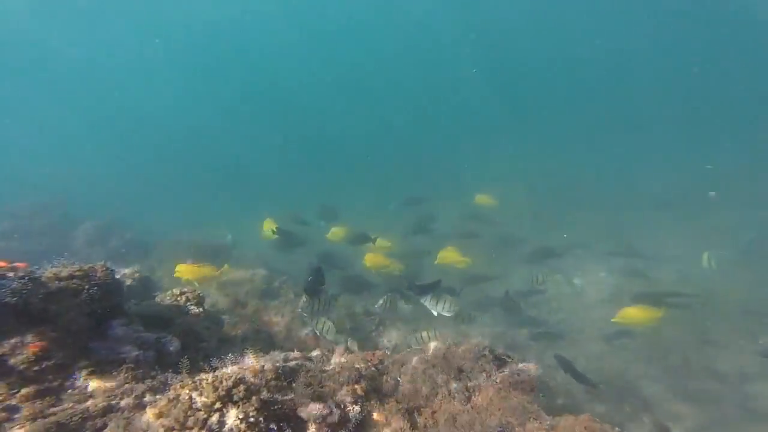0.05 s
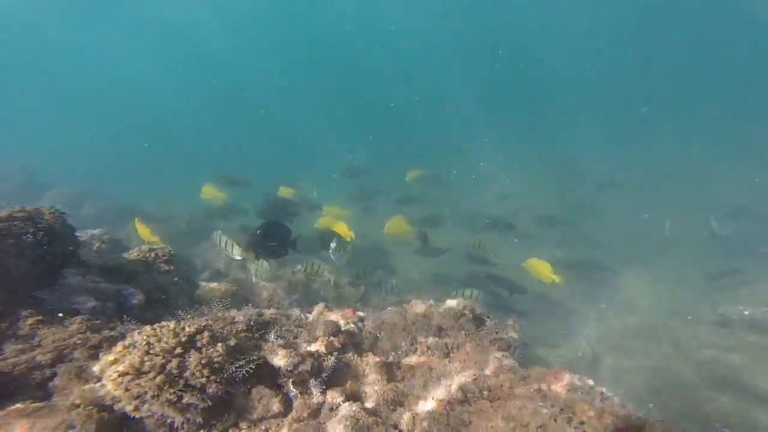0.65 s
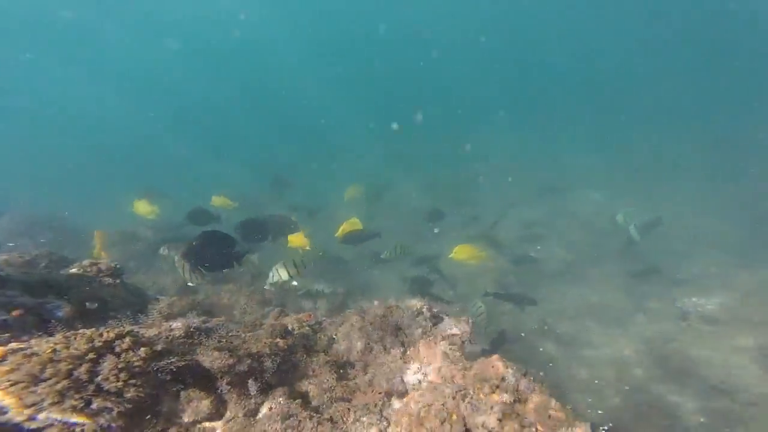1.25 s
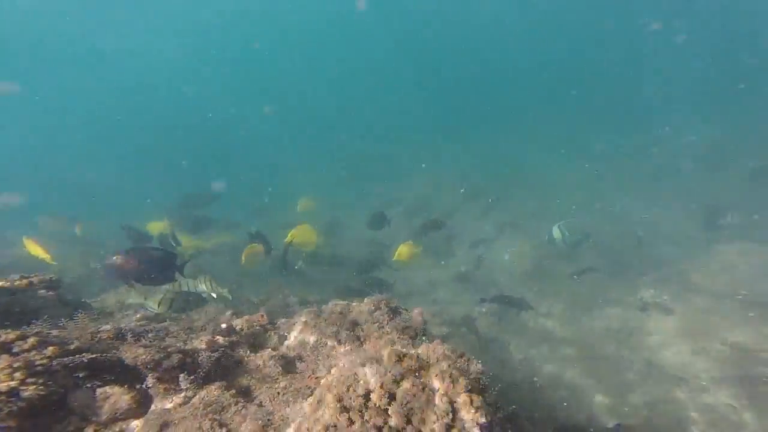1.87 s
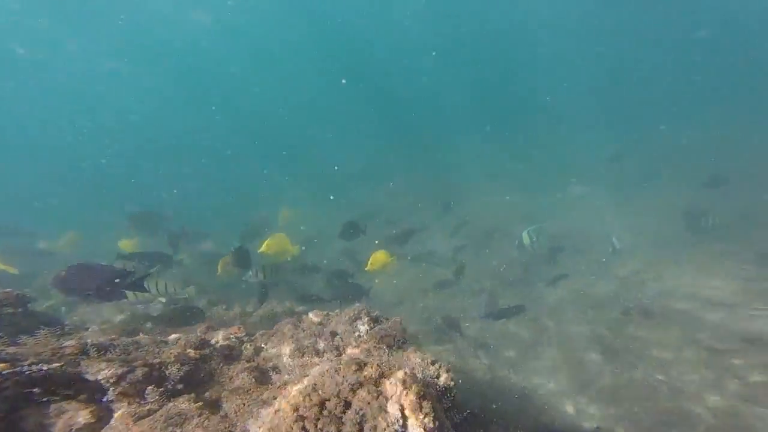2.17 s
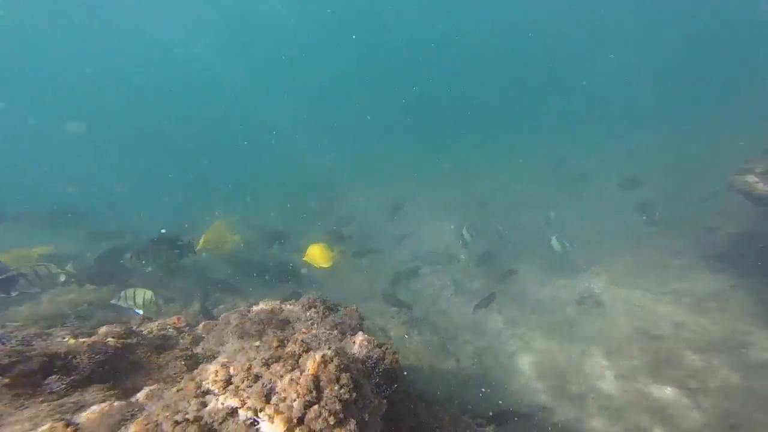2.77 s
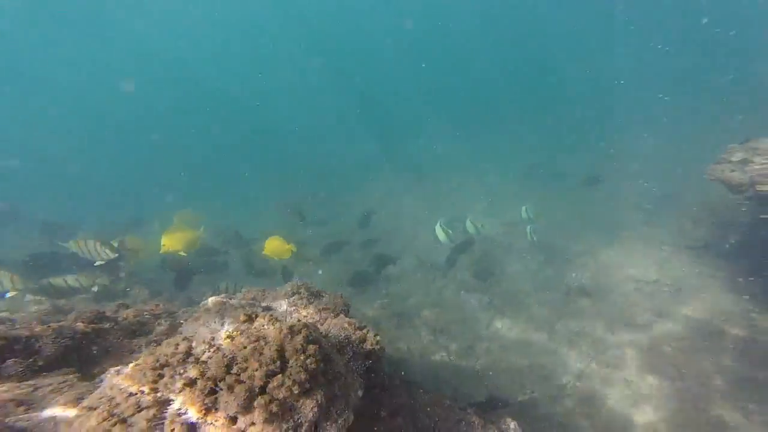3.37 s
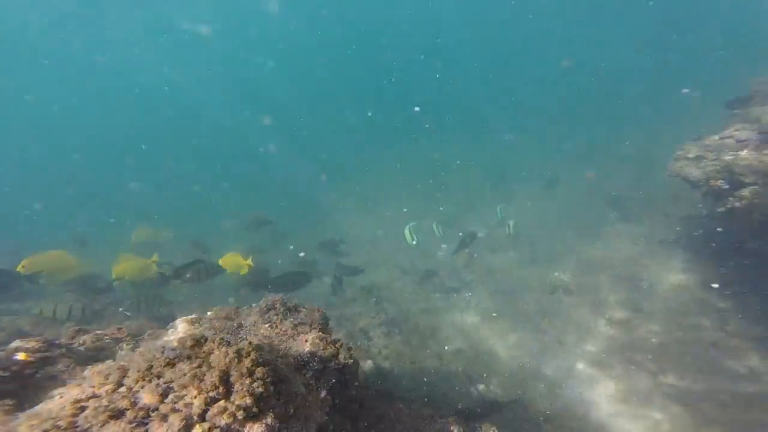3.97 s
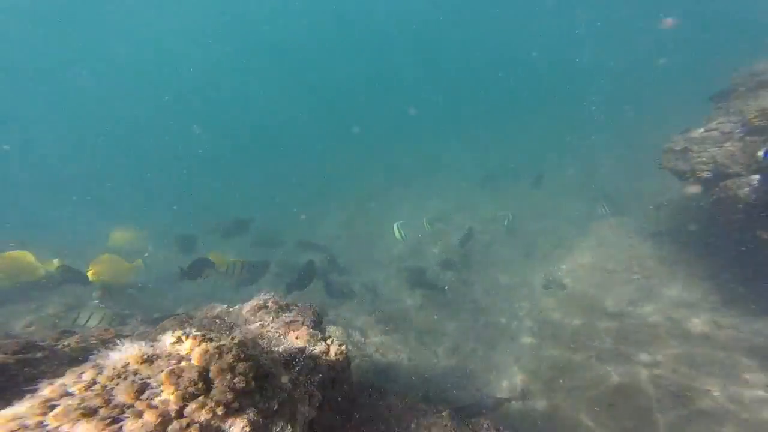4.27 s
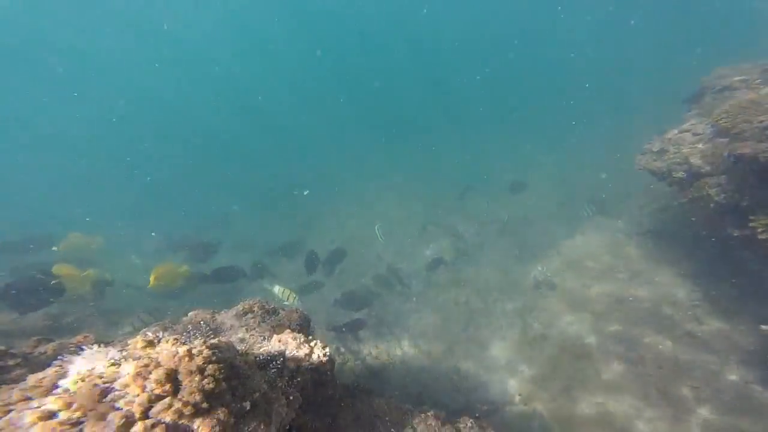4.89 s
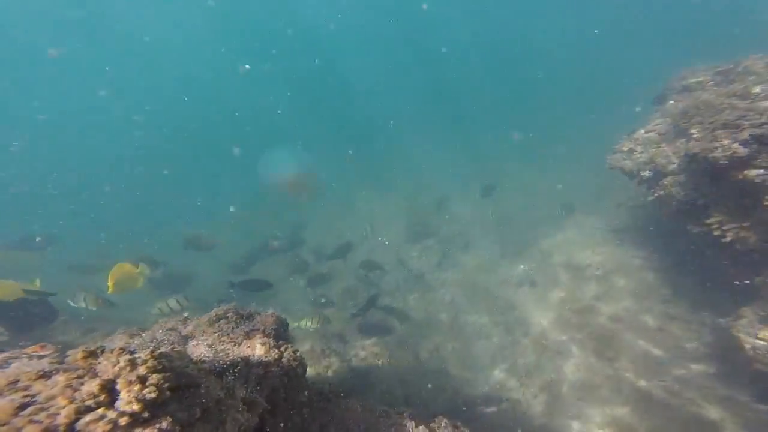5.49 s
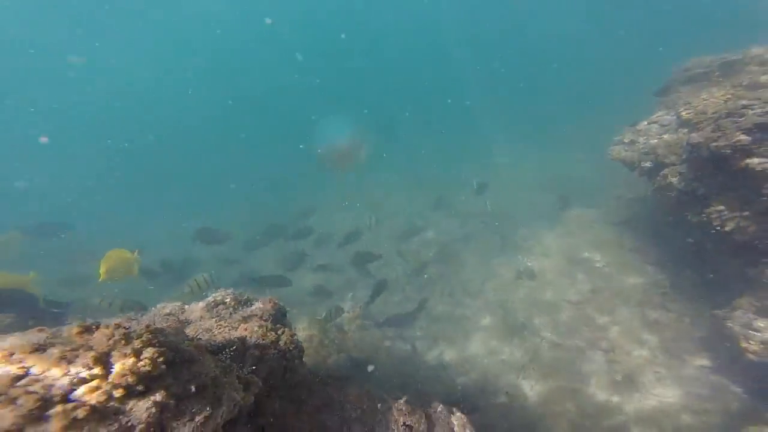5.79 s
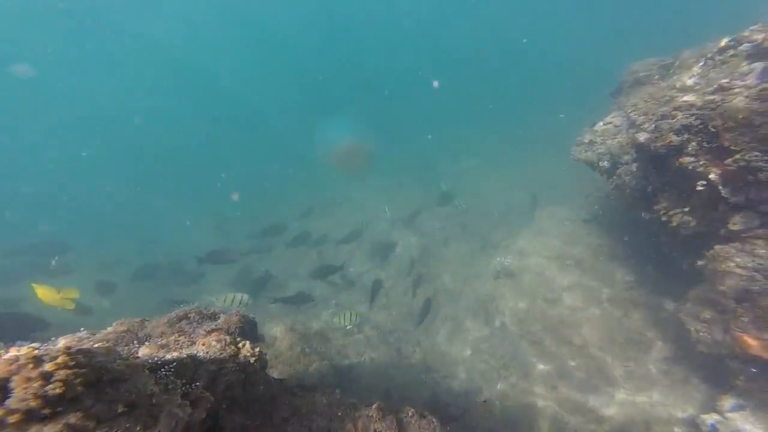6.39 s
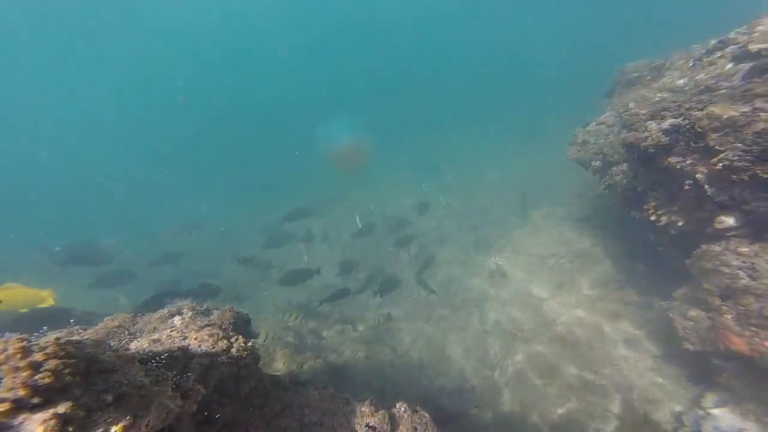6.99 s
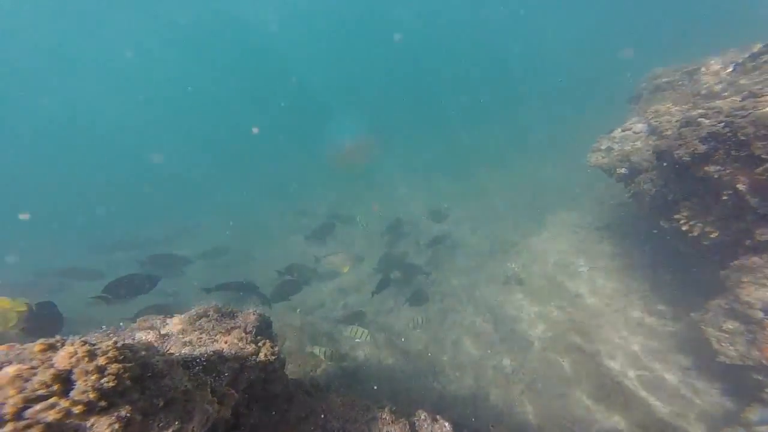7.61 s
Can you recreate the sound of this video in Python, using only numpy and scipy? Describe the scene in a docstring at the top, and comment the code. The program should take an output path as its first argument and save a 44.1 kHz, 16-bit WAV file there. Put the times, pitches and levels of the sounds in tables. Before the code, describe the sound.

Underwater on a shallow reef, snapping shrimp and grazing fish make a dense, uneven crackle, with sharper close clicks and small hollow pops standing out. Beneath it, surging water rumbles against the microphone's waterproof case, with occasional soft gulps and very faint bubbling. Around five seconds the closest snaps briefly pause, then return as the rumble slowly eases.

```python
"""A camera in a waterproof case drifts over a shallow reef near a rocky shore.
From the start, surging water rumbles along the case, tiny bubbles ring faintly, and snapping shrimp
and grazing fish crackle all around. Each snap rings the case for a few milliseconds.
From half a second on, the water gulps softly now and then. Around five seconds the closest snaps
pause, then return while the rumble slowly eases."""
import sys
import numpy as np
from scipy import signal
from scipy.fft import rfft, irfft
from scipy.io import wavfile

SR = 44100
rng = np.random.default_rng(int(sys.argv[2]) if len(sys.argv) > 2 else 0)


def wav_record(signal):
    """Record a signal, one row per channel, as 16-bit PCM in the file named by sys.argv[1]."""
    frames = np.transpose(np.atleast_2d(signal))
    bounded = np.clip(frames, -1, 1)
    # unit amplitude maps onto the largest positive 16-bit level
    quanta = np.round(bounded * 32767).astype(np.int16)
    wavfile.write(sys.argv[1], SR, quanta)


N = 337365
TIME = np.arange(N) / SR

# how hard the water pushes on the case and swirls around it: time_s, push_db, churn_db
SURGE_LEVELS = [(0, -37, -50), (0.25, -36, -54), (0.55, -39, -43), (0.9, -38.5, -47.5), (1.4, -37, -53.0),
                (1.7, -37.5, -48), (2.65, -36, -49), (3.25, -36.5, -49.0), (3.9, -43, -51),
                (4.1, -36.5, -49), (4.45, -38.5, -52.5), (4.8, -44.5, -55), (5.55, -39, -51.5),
                (5.85, -45, -55.5), (6.2, -40.5, -53), (6.65, -41.5, -56.0), (7.25, -40, -57),
                (7.65, -48, -55.5)]
# the tone of the push, the swirls and the wash from the shore: frequency_hz, relative_db
PUSH_SPECTRUM = [(8, -3), (18, 2), (27, -0.5), (42, -6.5), (60, -10), (90, -18.5), (150, -46), (400, -101)]
CHURN_SPECTRUM = [(30, -3.5), (70, -8), (125, -1), (190, -8.5), (240, -16.5), (330, -20), (600, -26),
                  (1500, -48)]
WASH_SPECTRUM = [(100, -0.5), (250, 5.5), (450, 2.5), (700, 0.5), (1100, -2), (1600, -2.5), (4000, -29),
                 (9000, -15.5), (15000, -44)]
# how quickly the surge wobbles and the flurries of snaps come and go: frequency_hz, relative_db
WOBBLE_SPECTRUM = [(2, -6), (8, 0), (16, 0), (40, -30), (200, -100)]
FLURRY_SPECTRUM = [(1, -6), (4, 0), (15, 0), (40, -30), (200, -100)]
# how busy the reef sounds: time_s, relative_db
REEF_ACTIVITY = [(0.0, -50), (1.49, -51.5), (1.89, -48), (2.66, -50), (3.56, -51.5), (5.62, -53.5),
                 (6.44, -54), (7.65, -53)]
# the notes the case rings at: pitch_hz, relative_db, swell_s
CASE_NOTES = [(702, -16, 0.00063), (985, -15.5, 0.0021), (1661, -2, 0.0013), (2226, 0.5, 0.00066),
              (2630, -5, 0.00096), (2926, -8, 0.0018), (3486, -0.5, 0.0007), (4014, -2, 0.0007),
              (4780, -8, 0.00027), (5945, -4, 0.00032), (8065, 1.5, 0.00015), (10600, -8, 0.00015),
              (12800, -8, 0.0002)]
# spells of faint bubbling: start_s, end_s, middle_pitch_hz, loudest_db
BUBBLE_SPELLS = [(.35, .85, 1400, -46), (5.3, 5.7, 680, -49), (0, 8.7, 650, -60)]
# round pops and thin ticks a little way off (a higher ring_q rings longer):
# snaps_per_s, level_db, pitch_hz, spread_octaves, ring_q, crack_above_pop_db
CHATTER_VOICES = [(9, -15, 3140, 0.57, 3.9, -5), (4.7, -14, 8300, 0.19, 2.1, -6)]
# close snaps and dull knocks: start_s, level_db, pitch_hz, ring_q, crack_above_pop_db
CLOSE_SNAPS = [(0.0831, -12, 6200, 12, 1), (0.15, -7, 2100, 4.6, -14), (0.1854, 7.5, 2620, 6.2, -15.5),
               (0.2131, -6.5, 2520, 11.0, -7), (0.3266, -17.5, 4400, 0.69, -10),
               (0.459, -8.5, 4140, 9.2, -5), (0.5648, -3.5, 3950, 0.84, -6.5),
               (0.5834, -7.5, 2130, 1.9, -20), (0.633, 8.5, 2610, 5.8, -27.5), (0.677, -6, 3000, 5.6, -26),
               (0.7533, -9.5, 4290, 1.6, -22), (0.788, -6, 4560, 3.6, -22), (0.8225, 8.0, 2300, 4.4, -38),
               (0.8493, -6.5, 7950, 13, -1.5), (1.1102, -4.5, 5900, 1.15, -14),
               (1.1255, 5.5, 2700, 5.1, -32), (1.274, 3.5, 8000, 7, -17), (1.2959, 1.5, 2250, 5.9, -23),
               (1.4492, -1.5, 4880, 0.84, -5), (1.4633, -4.0, 3300, 3.1, -12),
               (1.5865, -5.5, 5560, 3, -8.5), (1.628, -2, 1880, 9, -11), (1.7329, -2, 7840, 2.9, -14),
               (1.7836, 0, 1890, 0.41, -14.5), (1.8377, -1.5, 2500, 0.85, -5), (2.017, 1, 2810, 6.2, -18),
               (2.0422, -7.0, 3060, 11.0, -6.5), (2.077, -11, 7140, 0.9, -14),
               (2.099, -7.5, 3440, 11.0, -9), (2.2225, -9, 7160, 0.86, -8), (2.34, -10, 6460, 1.9, -36),
               (2.3534, 1, 4600, 3.7, -14.5), (2.558, 5.5, 2290, 0.62, -16.5),
               (2.8446, -3.5, 4270, 6.4, -18), (2.9798, 0, 3350, 6.8, -17), (3.0522, -7.5, 2620, 6, -10),
               (3.1501, 0.5, 3100, 9.4, -14.5), (3.2529, -10, 7370, 1.4, -36),
               (3.3002, -4, 9050, 3.7, -13.5), (3.3662, -10.5, 6640, 1.16, -14),
               (3.4262, -4.0, 2120, 2.9, -17), (3.5287, 5, 3270, 7.2, -24), (3.5437, -3.5, 2540, 6.2, -19),
               (3.6086, -5.5, 4890, 0.8, -12), (3.9275, -0.5, 1630, 0.9, -12),
               (3.962, -9.5, 3300, 0.84, -12), (4.042, -13.5, 5310, 0.37, -19),
               (4.077, -5.5, 7080, 0.8, -12), (4.0836, -1.5, 2800, 3.3, -6), (4.1328, -6.5, 9060, 1.6, -34),
               (4.2181, 4.5, 3700, 0.77, -8), (4.2841, -11, 13360, 0.56, -10),
               (4.4417, -13, 7330, 0.75, -3), (4.6292, -13, 3020, 0.55, -9), (5.3228, -12.0, 3050, 1, -7.5),
               (5.5375, 8.0, 6160, 1.8, -7.5), (5.753, 1.5, 5330, 0.67, -4.5), (5.8104, 5.5, 5860, 5.4, -9),
               (6.111, 0, 8000, 3, -13), (6.1495, 4.5, 2450, 5.6, -19), (6.1763, -2.5, 2970, 8.8, -8.5),
               (6.2824, -8.5, 13200, 0.5, -4), (6.3119, -3, 13360, 2.2, -15.5),
               (6.4106, -5.5, 4010, 12, -7.5), (6.4344, -7.5, 3600, 4.8, -17), (6.5889, -5, 2230, 4.8, -12),
               (6.641, -11.5, 1820, 5.8, -5.5), (6.774, -12, 13360, 0.95, -2.5),
               (6.878, -2.5, 2970, 9.3, -3.5), (6.9138, -11, 7450, 1.3, -13), (6.9272, -2, 2820, 4, -9.5),
               (7.0222, -8.5, 12000, 2, -13), (7.3907, -8.5, 13360, 0.95, -12),
               (7.484, -8, 10010, 4.6, -6.5), (7.6006, -5.5, 3000, 2.9, -7)]
# gulps of water: start_s, pitch_hz, peak_db, swell_s
WATER_GULPS = [(.476, 156, -39.5, 0.0052), (0.632, 189, -38.5, .01), (0.863, 130, -42.5, 0.025),
               (1.678, 132, -37.5, 0.0091), (2.68, 180, -42.5, 0.0096), (3.071, 138, -42, 0.0081),
               (3.21, 98, -35.5, 0.0081), (4.13, 115, -42, 0.0086), (4.487, 136, -40, 0.0067),
               (6.055, 130, -44, 0.007), (6.828, 109, -39, 0.006)]


def gain_of(db):
    """Turns decibels into a number to multiply a sound by."""
    return 10 ** (np.asarray(db) / 20)


def curve(rows, column):
    """One column of a table, joined by straight lines in time."""
    rows = np.asarray(rows)
    return np.interp(TIME, rows[:, 0], rows[:, column])


def add(mix, start_s, sound):
    """Mixes a sound in at its start time."""
    part = mix[max(round(start_s * SR), 0):][:len(sound)]
    part += sound[:len(part)]


def noise(spectrum):
    """Noise with the given tone and an average strength (rms) of 1."""
    hz, db = np.transpose(spectrum)
    shape_db = np.interp(np.log(np.fft.rfftfreq(N, 1 / SR) + 1), np.log(hz + 1), db)
    shaped = irfft(rfft(rng.standard_normal(N)) * gain_of(shape_db), N)
    return shaped / np.sqrt(np.mean(shaped ** 2) + 1e-20)


def swelling_tone(t, hz, swell_s):
    """A tone that grows for swell_s, then dies away."""
    return t / swell_s * np.exp(1 - t / swell_s) * np.sin(2 * np.pi * hz * t)


def surge(push_db=-0.4, churn_db=-2.0, wash_db=-60, lumps_db=3.0, sway_db=2.5):
    """Water pushes on the case and swirls off in uneven lumps; a soft wash comes from the shore."""
    push = noise(PUSH_SPECTRUM) * gain_of(curve(SURGE_LEVELS, column=1) + push_db)
    push *= gain_of(sway_db * noise(WOBBLE_SPECTRUM))
    churn = noise(CHURN_SPECTRUM) * gain_of(curve(SURGE_LEVELS, column=2) + churn_db)
    churn *= gain_of(lumps_db * noise(WOBBLE_SPECTRUM))
    return push + churn + noise(WASH_SPECTRUM) * gain_of(wash_db)


def snap(hz, q, crack_db, direct=0.063, tilt_db_per_octave=0.2, scatter_hz=4200, scatter_s=0.0018,
         thud_db=-5, thud_hz=850, roundness=0.22, size=512):
    """A ringing pop plus a sharp crack; rough rock scatters the treble into a brief burst."""
    f = abs(np.fft.fftfreq(size, 1 / SR))
    ratio = f / hz
    pop = np.sqrt(ratio) / ((q * (1 - ratio ** 2)) ** 2 + ratio ** 2) / (1 + (ratio / 1.35) ** 14)
    # swelling over a cycle or two makes the pop sound round
    pop /= 1 + (roundness * q * (ratio - 1 / (ratio + 1e-6))) ** 4
    crack = gain_of(crack_db + tilt_db_per_octave * np.log2(np.maximum(f, 2000) / 5000)) ** 2
    # low pops also shove the water: a thud under the ring
    thud = gain_of(thud_db) ** 2 / (1 + (f / thud_hz) ** 8) / (1 + (hz / 2850) ** 20)
    # turn this spectrum into a pulse that starts suddenly, then fades (minimum phase)
    log_gain = np.log(pop + thud + crack) / 2
    clean = np.fft.ifft(np.exp(np.conj(signal.hilbert(log_gain)))).real[:size // 2]
    burst = rng.standard_normal(size) * np.exp(-np.arange(size) / SR / scatter_s)
    paths = np.sqrt(1 - direct ** 2) * burst / np.linalg.norm(burst)
    paths[0] = direct  # the part that arrives straight
    # low sounds pass the rocks unbroken
    treble = 1 / np.sqrt(1 + (scatter_hz / (f + 1)) ** 6)
    scatter = np.sqrt(1 - treble ** 2) + treble * np.fft.fft(paths)
    return np.fft.ifft(np.fft.fft(clean, size) * scatter).real[:size * 3 // 4]


def far_snaps(nearest_db=-15, per_s=1300, reach=6, falloff=1.5, low_hz=2600, high_hz=15000,
              q=3.1, crack_db=-14, flurry_db=3.5, count=64):
    """Shrimp across the seabed snap in flurries: the farther, the more of them and the fainter."""
    chance, place, kind = rng.random((3, N))
    flurries = gain_of(flurry_db * noise(FLURRY_SPECTRUM))
    voices = [snap(hz, q * rng.uniform(0.6, 3.84), crack_db)
              for hz in np.geomspace(low_hz, high_hz, count)]
    out = np.zeros(N)
    for at in np.flatnonzero(chance < flurries * per_s / SR):
        distance = np.sqrt(1 + place[at] * reach ** 2)
        add(out, at / SR, voices[int(kind[at] * count)] / distance ** falloff)
    return gain_of(nearest_db) * out


def busy_gain(follow):
    """Louder when the reef is busy; follow sets how strongly."""
    busy_db = curve(REEF_ACTIVITY, column=1)
    return gain_of(follow * (busy_db - busy_db.mean()))


def far_reef(sizzle_db=-62):
    """The far crackle, over a sizzle of snaps too distant to tell apart."""
    sizzle = gain_of(sizzle_db) * rng.standard_normal(N)
    return (far_snaps() + sizzle) * busy_gain(follow=0.29)


def shallow_echoes(sound, echo_db=-22, fade_s=0.039, echoes_per_s=500, patches=5):
    """Snaps bounce off the surface and rocks; each patch of reef has its own echoes."""
    t = np.arange(SR // 6) / SR
    patch = (np.arange(N) // (SR // 30)) % patches  # the patches take turns
    out = sound.copy()
    for k in range(patches):
        echoes = rng.standard_normal(len(t)) * (rng.random(len(t)) < echoes_per_s / SR)
        echoes *= (t > .004) * gain_of(-60 * t / fade_s)
        echoes /= np.linalg.norm(echoes)
        out += gain_of(echo_db) * signal.oaconvolve(sound * (patch == k), echoes)[:N]
    return out


def case_ring(sound, bounce=0.91, bounce_s=.001555, bounce_hz=2800, size=1024):
    """Each snap rings the case; the low notes come back once more from the far wall."""
    t, f = np.arange(size) / SR, np.fft.rfftfreq(size, 1 / SR)
    ring = np.zeros(size)
    for k, (hz, db, swell_s) in enumerate(CASE_NOTES):
        ring += (-1) ** k * gain_of(db) * swelling_tone(t, hz, swell_s)
    # the second arrival doubles each knock and makes it hollow
    again = bounce * np.exp(-2j * np.pi * f * bounce_s) / (1 + (f / bounce_hz) ** 20)
    ring = irfft(rfft(ring) * (1 + again), size)
    return signal.oaconvolve(sound, ring / np.linalg.norm(ring))[:N]


def bubbles(per_s=35, cycles=7, rise_per_s=4, spread_db=10):
    """Small bubbles ring briefly and glide up in pitch."""
    t, out = np.arange(SR // 14) / SR, np.zeros(N)
    for start_s, end_s, middle_hz, db in BUBBLE_SPELLS:
        for when, pitch, faintness in rng.random((int(per_s * (end_s - start_s)), 3)):
            hz = middle_hz * 2 ** (0.52 * (pitch - .5))
            ring = np.exp(-t * hz / cycles) * np.sin(2 * np.pi * hz * t * (1 + rise_per_s * t / 2))
            add(out, start_s + when * (end_s - start_s), gain_of(db - spread_db * faintness) * ring)
    return out


def chatter(spread_db=1.5, q_octaves=0.7, crack_spread_db=5):
    """Animals a little way off snap at uneven intervals."""
    out = np.zeros(N)
    for per_s, db, hz, octaves, q, crack_db in CHATTER_VOICES:
        draws = rng.uniform(-1, 1, (200, 5))[:int(per_s * N / SR)]
        for k, (when, size, pitch, ring, sharpness) in enumerate(draws):
            longer = 2 ** (q_octaves * ring)
            pop = snap(hz * 2 ** (octaves * pitch), q * longer, crack_db + crack_spread_db * sharpness)
            pop *= np.sqrt(longer)  # a longer ring carries the same energy
            add(out, abs(k + .5 + when) / per_s, pop * gain_of(db + spread_db * size))
    return out * busy_gain(follow=0.9)


def close_snaps(zing_db=11, zing_hz=13200, zing_q=7):
    """Snaps and knocks from nearby rocks; the hardest cracks are nearest and least scattered."""
    out = np.zeros(N)
    cycles = zing_hz * np.arange(SR // 200) / SR
    zing = np.exp(-np.pi * cycles / zing_q) * np.cos(2 * np.pi * cycles) * 2 / zing_q
    for start_s, db, hz, q, crack_db in CLOSE_SNAPS:
        nearness = 1 / (3 + np.exp(-db - crack_db))
        pop = snap(hz, q, crack_db, direct=0.21 + 1.3 * nearness, tilt_db_per_octave=-nearness)
        add(out, start_s, pop * gain_of(db))
        # the nearest cracks keep a thin, very high ring
        add(out, start_s, zing * np.sqrt(nearness) * gain_of(db + crack_db + zing_db))
    return out


def gulps():
    """Pockets of water throb for a few cycles."""
    t, out = np.arange(SR // 5) / SR, np.zeros(N)
    for start_s, hz, db, swell_s in WATER_GULPS:
        add(out, start_s, gain_of(db) * swelling_tone(t, hz, swell_s))
    return out


def scene():
    """All snaps cross the shallows and ring the case; the water moves around it."""
    snaps = close_snaps() + chatter() + far_reef()
    crackle = case_ring(shallow_echoes(snaps))
    return (crackle + surge() + gulps() + bubbles())[None]


def record(dry, soft_hz=15600, cutoff_hz=16150):
    """The microphone softens the highest treble; a steep filter cuts off what lies above."""
    softened = signal.sosfilt(signal.butter(6, soft_hz, fs=SR, output="sos"), dry)
    steep_filter = signal.firwin(127, cutoff_hz, window=("kaiser", 9), fs=SR)
    return signal.oaconvolve(softened, steep_filter[None], "same")


dry = scene()
out = record(dry)
wav_record(out)
```